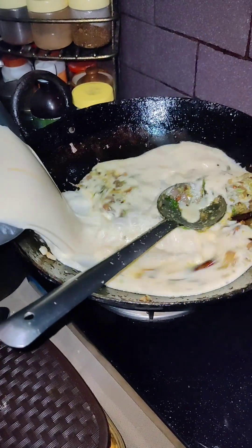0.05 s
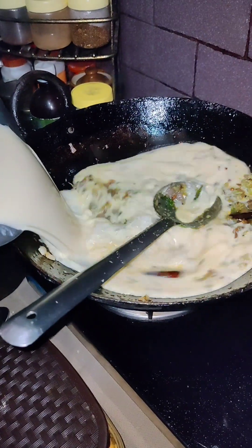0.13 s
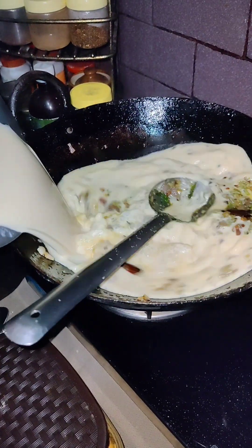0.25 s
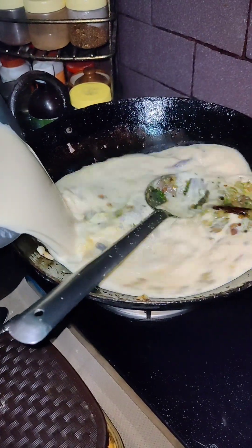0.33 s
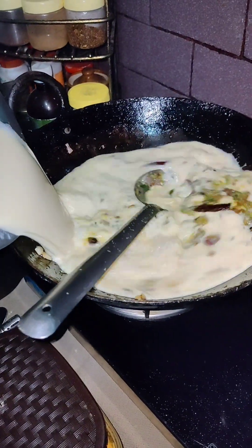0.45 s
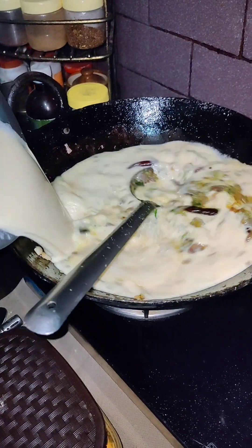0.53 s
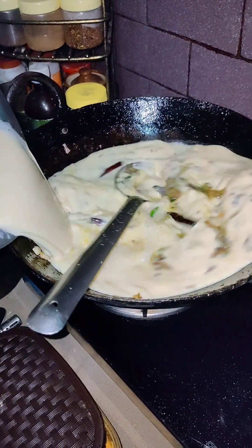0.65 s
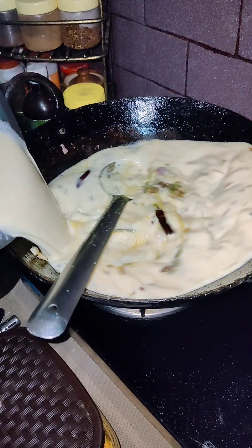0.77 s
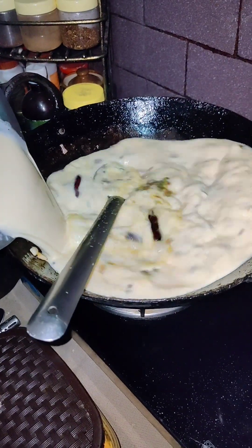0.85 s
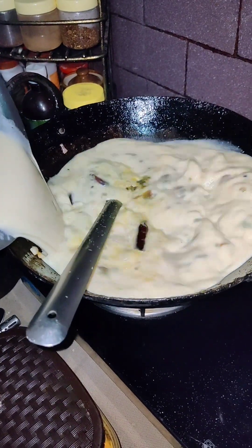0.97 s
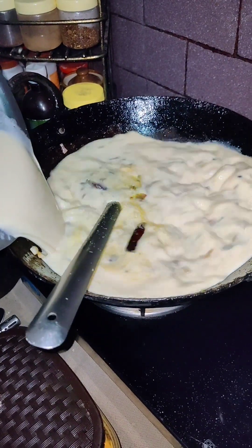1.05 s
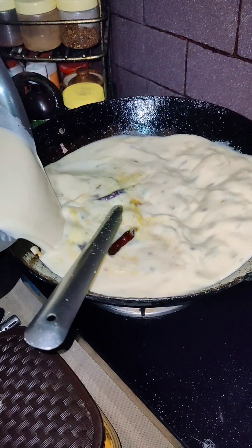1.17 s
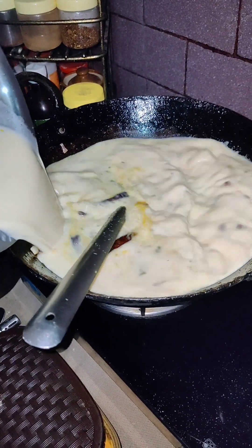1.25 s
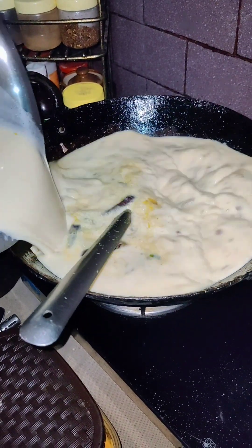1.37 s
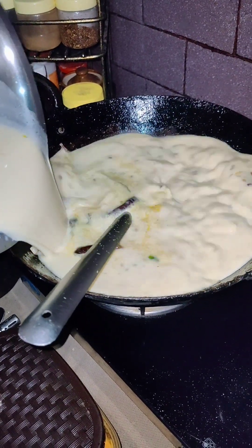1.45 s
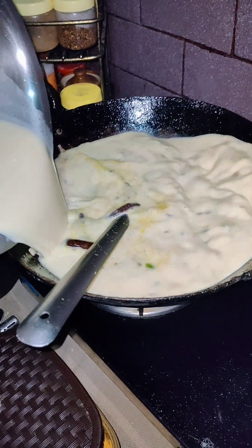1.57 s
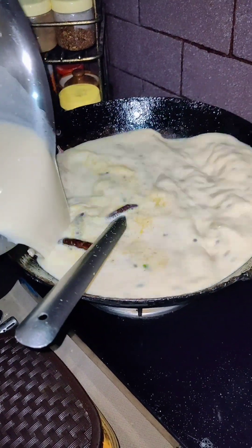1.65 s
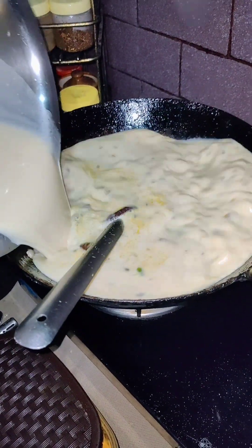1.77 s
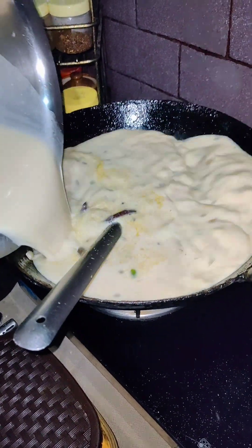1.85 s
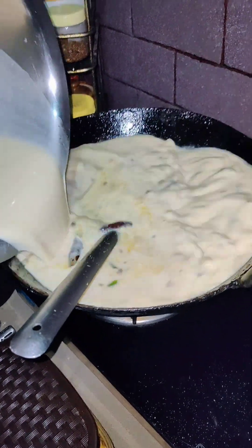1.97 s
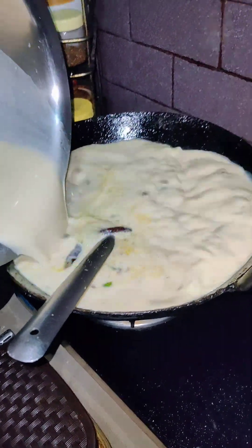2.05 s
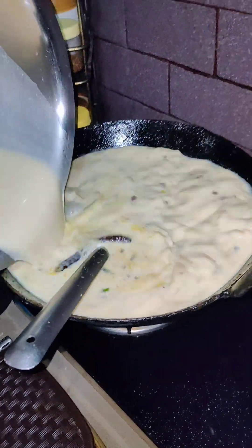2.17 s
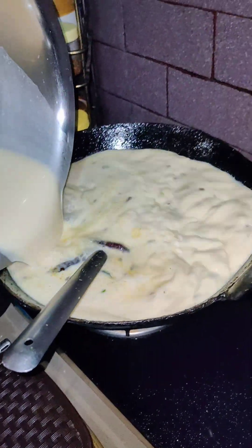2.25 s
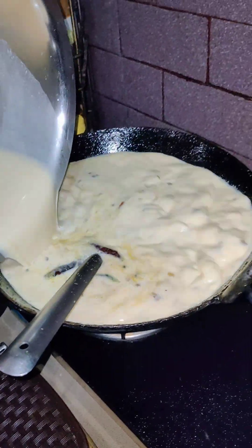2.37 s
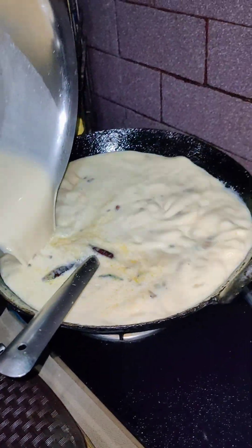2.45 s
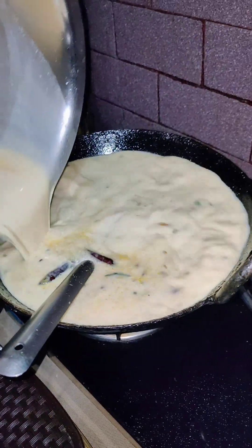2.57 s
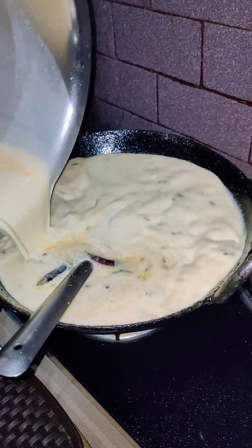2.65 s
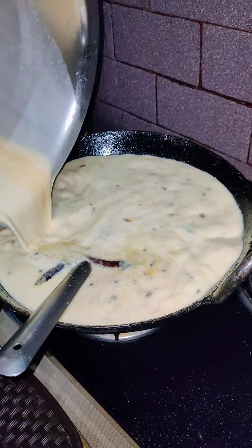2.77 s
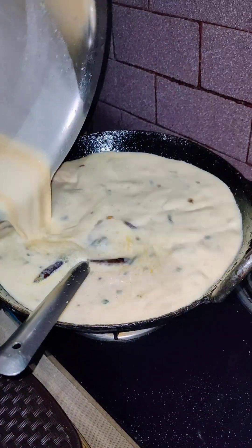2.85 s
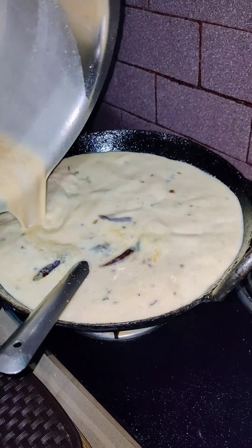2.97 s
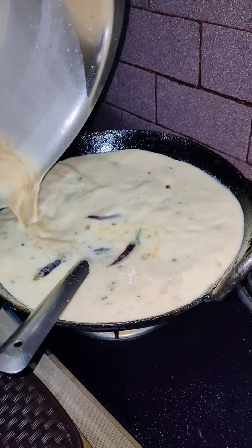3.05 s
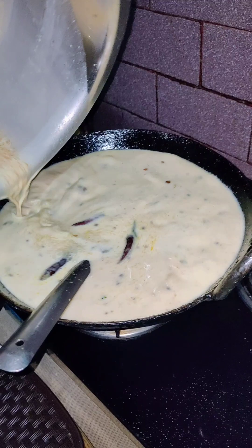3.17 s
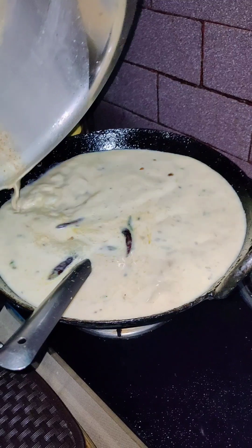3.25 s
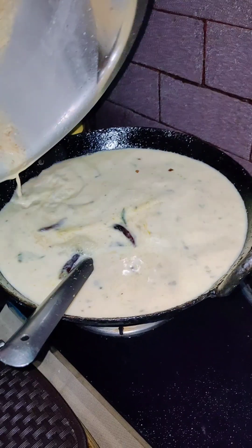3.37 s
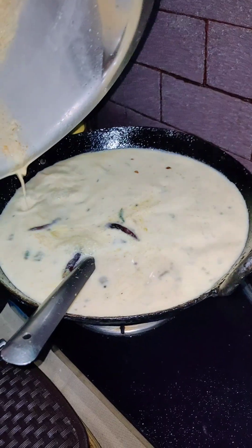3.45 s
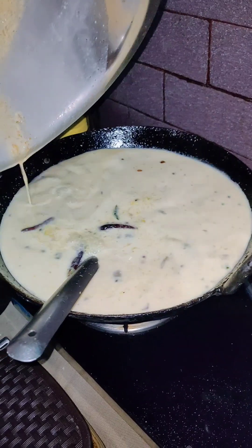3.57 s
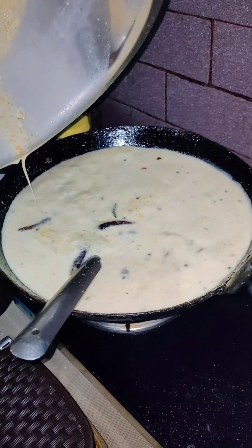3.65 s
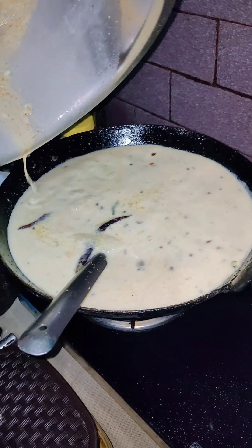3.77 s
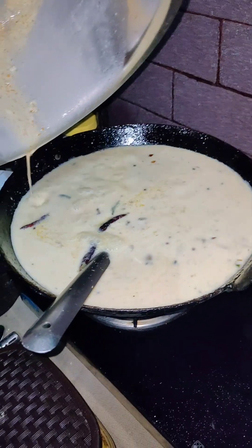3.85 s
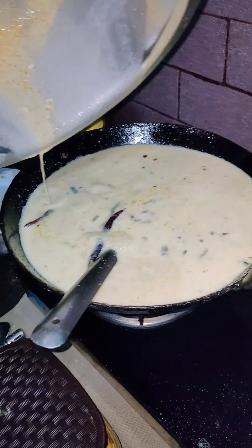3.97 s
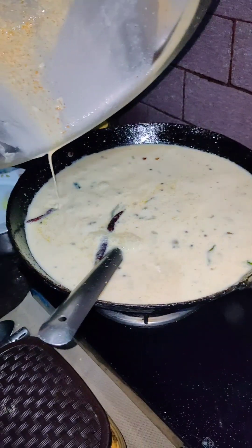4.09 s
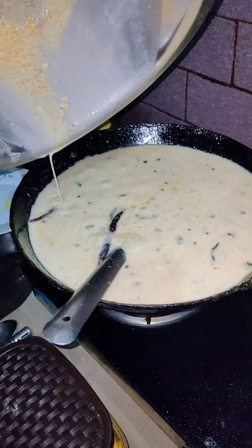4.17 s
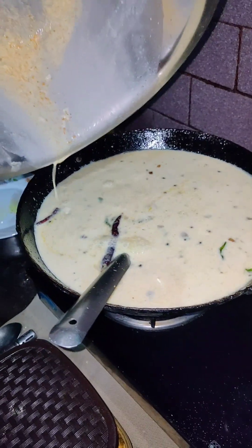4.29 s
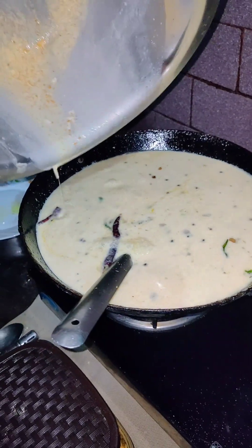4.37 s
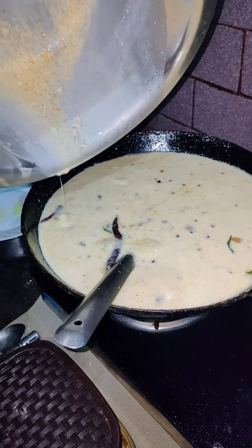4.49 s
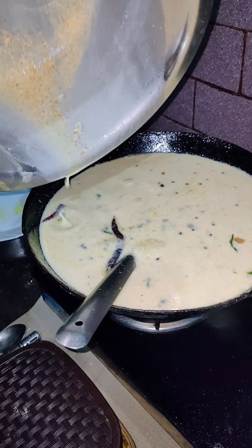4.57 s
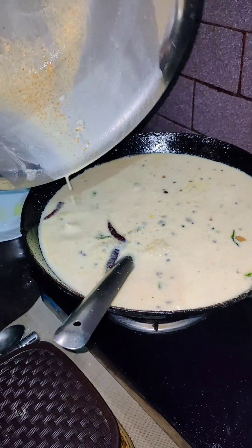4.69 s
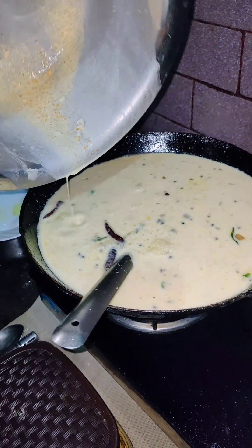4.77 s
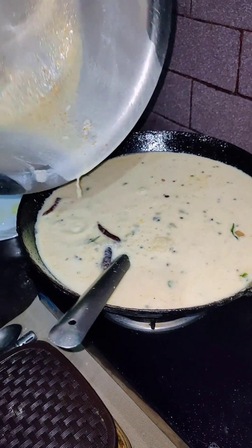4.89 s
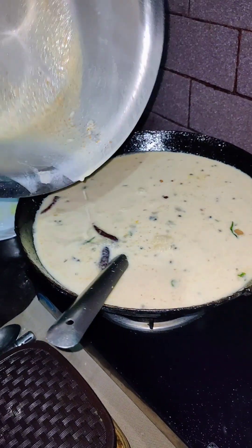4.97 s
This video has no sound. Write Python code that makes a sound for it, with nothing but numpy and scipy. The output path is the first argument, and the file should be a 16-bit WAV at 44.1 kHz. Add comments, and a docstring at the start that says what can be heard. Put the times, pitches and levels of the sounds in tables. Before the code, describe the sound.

Close, loud sizzling and bubbling of batter in hot oil fades to a faint fizz and drips as a steel pot softly bonks.

```python
"""Loud bubbling and sizzling, close to a stereo microphone: batter poured into a hot oiled pan in a small
kitchen. Steam bubbles boil up, getting fewer, smaller and higher as the batter covers and cools the metal,
until only a thin fizz at the rim and a few plops and drips are left. The heavy steel pot bonks softly as
it is tipped and, emptied, is knocked at the very end. An appliance hums underneath."""
import sys
import numpy as np
from scipy import signal
from scipy.fft import rfft, irfft, next_fast_len
from scipy.io import wavfile
from scipy.ndimage import uniform_filter1d, map_coordinates

SR = 44100
rng = np.random.default_rng(int(sys.argv[2]) if len(sys.argv) > 2 else 0)


def materialize(psi):
    """Save the field psi as 16-bit PCM at rate SR to the path in sys.argv[1].

    A 1-D psi becomes a single channel; in a 2-D psi each row is a channel.
    """
    bounded = np.clip(np.atleast_2d(psi).T, -1, 1)
    quanta = np.round(bounded * 32767).astype(np.int16)
    wavfile.write(sys.argv[1], SR, quanta)


N = 221838

# batter covering the pan floor: (time [s], share of the sizzle that comes from the rim [0-1])
COVERED = [(0, 0), (2.3, 0), (3.1, .95), (5.03, 1)]
# spectrum of the finest spray: (frequency [Hz], level [dB])
SPRAY = [(3000, -29.5), (6000, -3.5), (8000, -5), (10500, -4), (13000, -5), (15000, -5.5), (16000, -16)]


def amp(db):
    """Decibels to gain."""
    return 10 ** (np.asarray(db) / 20)


def unit(x):
    """Scale to rms 1."""
    return x / np.sqrt(np.mean(x ** 2) + 1e-20)


def along(points, hz):
    """Read (frequency [Hz], value) points on a log axis."""
    freqs, values = np.transpose(points)
    return np.interp(np.log(hz + 1), np.log(freqs + 1), values)


def curves(rows):
    """One value per sample for each column after the time."""
    times, *columns = np.transpose(rows)
    return [np.interp(np.arange(N) / SR, times, column) for column in columns]


def wobble(rate):
    """A smooth random curve, rate knots a second."""
    return map_coordinates(rng.standard_normal(4096), [np.arange(N) * rate / SR], mode="wrap")


def filtered(x, response):
    """Filter x by a gain that is a function of frequency."""
    size = next_fast_len(N + SR // 4)
    return irfft(rfft(x, size) * response(np.fft.rfftfreq(size, 1 / SR)), size)[..., :N]


def coloured(x, spectrum):
    """x shaped by the given spectrum, at rms 1."""
    return unit(filtered(x, lambda hz: amp(along(spectrum, hz))))


def bump(hz, centre_hz, width_hz):
    """Shape of one resonance, 1 at its centre."""
    return 1 / (1 + (2 * (hz - centre_hz) / width_hz) ** 2)


def resonate(x, peaks):
    """x through peaks and notches: (centre [Hz], width [Hz], lift [dB])."""
    return filtered(x, lambda hz: amp(sum(db * bump(hz, centre, width) for centre, width, db in peaks)))


def steady(x):
    """Take the slow drift out of a stream of grains, leaving rms 1."""
    return x / np.sqrt(np.abs(uniform_filter1d(np.mean(x ** 2, axis=0), size=5000)) + 1e-12)


def patchy(x, depth_db):
    """Each narrow band of x swells and sinks quickly on its own."""
    bands = signal.stft(x, nperseg=512)[2]
    swell = rng.standard_normal(bands.shape[1:])
    for _ in range(2):
        swell = uniform_filter1d(uniform_filter1d(swell, size=5, axis=0), size=7, axis=1)
    return signal.istft(bands * amp(depth_db * unit(swell)), nperseg=512)[1][:, :N]


def add(track, s, sound):
    """Mix a sound into a track at time s."""
    part = track[..., round(s * SR):][..., :sound.shape[-1]]
    part += sound[..., :part.shape[-1]]


def kitchen(x, wet_db, near_db=2, near_t60=0.12, shared_hz=650):
    """From one spot to both microphones: direct sound, then nearby pan wall and tiles, then the room."""
    # reverberation of the room: (frequency [Hz], t60 [s])
    decay = [(200, 0.11), (1000, 0.52), (4000, 0.25), (15000, 0.044)]
    hz, t, bands = signal.stft(rng.standard_normal((2, SR // 3)), SR, nperseg=256)
    tail = signal.istft(bands * amp(-60 * t / along(decay, hz)[:, None]), SR, nperseg=256)[1]
    t = np.arange(tail.shape[1]) / SR
    near = rng.standard_normal(tail.shape) * amp(-60 * t / near_t60) * (t > .001)
    paths = (amp(wet_db) * unit(tail) + amp(near_db) * unit(near)) / np.sqrt(len(t))
    # long waves reach both microphones alike
    alike = np.exp(-(np.fft.rfftfreq(len(t), 1 / SR) / shared_hz) ** 2)
    left, right = rfft(paths)
    paths[0] = irfft(alike * right + np.sqrt(1 - alike ** 2) * left, len(t))
    paths[[0, 1], [rng.integers(6, 9), 0]] += 1  # direct sound reaches the right microphone first
    paths /= np.linalg.norm(paths, axis=1, keepdims=True)
    return signal.fftconvolve(x[None], paths, axes=1)[:, :N]


def bubbles(activity, low_hz, high_hz, count, cycles, spread_db, rise):
    """A stream of ringing bubbles, as dense as the activity; small ones ring higher and die sooner."""
    when, small, strength, phase = rng.random((count, 4)).T
    start = np.minimum(np.searchsorted(np.cumsum(activity) / activity.sum(), when), N - 1)
    pitch = low_hz[start] * (high_hz[start] / low_hz[start]) ** small
    n = np.arange(900)
    turns = pitch[:, None] * n / SR
    age = turns / cycles
    gain = amp(-spread_db * np.log(1 - .99 * strength))
    envelope = gain[:, None] * age ** 2 * np.exp(-age)
    ring = envelope * np.sin(2 * np.pi * (turns * (1 + rise * age) + phase[:, None]))
    return np.bincount((start[:, None] + n).ravel(), ring.ravel(), N)[:N]


def background(rumble_db=-62.5, thud_s=3.1, thud_db=-57.5, thud_width_s=.055):
    """Room tone, stronger on the right: an unsteady appliance hum, low noise and one soft, deep thud."""
    # tones of the appliance: (frequency [Hz], level [dB])
    hum_tones = [(48.4, -59), (75.4, -68), (150.7, -67)]
    # spectra of the room's rumble and its faint hiss: (frequency [Hz], level [dB])
    rumble_colour = [(20, -2), (32, -5), (50, -6), (80, 8.5), (100, 8), (125, 3.5), (160, 1), (210, -16.5),
                     (400, -60)]
    hiss_colour = [(100, -9), (250, 11), (320, 2.5), (420, 9.5), (650, -4.5), (1200, -3), (4000, -12),
                   (16000, -10.5)]
    t = np.arange(N) / SR
    thud = amp(thud_db) * np.exp(-((t - thud_s) / thud_width_s) ** 2)
    hum = sum(amp(db + 1.6 * wobble(5.43)) * np.sqrt(2) * np.sin(2 * np.pi * hz * t + 0.69 * wobble(2.44))
              for hz, db in hum_tones)
    noise = lambda: rng.standard_normal(N) + 0.71 * rng.standard_normal((2, N))
    rumble = np.hypot(amp(rumble_db), thud) * coloured(noise(), rumble_colour)
    hiss = amp(-71) * coloured(noise(), hiss_colour)
    return hum * amp([[-4.5], [2.5]]) + (rumble + hiss) * amp([[-2.5], [1.5]])


def steam(pitch_hz=6270, width_hz=240):
    """Steam squeezes through a pinhole at the rim with a thin, breathy whistle."""
    # strength of the jet: (time [s], level [dB])
    jet = [(0, -100), (2.9, -70), (3.55, -68), (3.95, -66.5), (4.15, -65), (4.18, -57), (4.22, -65),
           (5.03, -65.5)]
    whistle = unit(filtered(rng.standard_normal(N), lambda hz: bump(hz, pitch_hz, width_hz)))
    return amp(curves(jet)[0]) * unit(kitchen(whistle, wet_db=5, near_db=-20))


def pot_clank():
    """Left of centre, the steel pot, damped by the hand and its coat of batter, gives a dull clank."""
    # knocks on the pot: (time [s], level [dB])
    knocks = [(5.013, -42.5), (5.0215, -35)]
    # modes of the emptied pot: (frequency [Hz], level [dB], t60 [s])
    modes = [(587, -39, 0.076), (876, 3, 0.18), (1400, -7, 0.11), (1650, -3, 0.12), (2040, 2, 0.12)]
    out, t = np.zeros(N), np.arange(SR // 5) / SR
    ring = sum(amp(level - 60 * t / t60) * np.sin(2 * np.pi * hz * t) for hz, level, t60 in modes)
    for s, db in knocks:
        add(out, s, amp(db - 9.5) * ring)
    return kitchen(out, wet_db=2, near_db=-7) * amp([[2], [-2]])


def pot_bonks(attack_s=0.015, flutter_rad=0.62, flutter_hz=90, slap_delay_s=0.012, slap_t60=0.16):
    """A soft push sways the batter-laden pot: a short, low, unsteady ring, then a hollow slap."""
    # the pot is shifted and tipped: (time [s], ring level [dB], pitch [ratio], slap level [dB])
    pushes = [(1.174, -55, .74, -47), (2.497, -37.5, 0.98, -40)]
    # modes of the laden pot: (frequency [Hz], level [dB], t60 [s])
    modes = [(245, -1, 0.07), (320, 8, 0.08), (372, 11, 0.18), (520, -9, 0.1)]
    # hollow ring of the slap: (centre [Hz], width [Hz], lift [dB])
    slap_peaks = [(705, 47, 18), (1000, 60, 13), (1540, 100, 18), (1850, 70, 26), (2030, 50, 15),
                  (2490, 110, 13)]
    # broad spectrum of the slap: (frequency [Hz], level [dB])
    slap_colour = [(120, -11), (210, 13), (400, 9), (560, 1), (750, 2), (2500, 0.5), (4000, -9),
                   (8000, -30)]
    rings, slaps, t = np.zeros((2, N)), np.zeros(N), np.arange(SR // 4) / SR
    sway = lambda: flutter_rad * map_coordinates(rng.standard_normal(len(t)), [t * flutter_hz], order=1)
    for s, db, ratio, slap_db in pushes:
        ring = sum(amp(level - 60 * t / t60) * np.sin(2 * np.pi * ratio * hz * t + sway())
                   for hz, level, t60 in modes)
        heard = kitchen(ring * (1 - np.exp(-t / attack_s)) ** 2, wet_db=-5, near_db=-11, near_t60=0.083)
        add(rings, s, amp(db) * heard / np.abs(heard).max())
        slap = coloured(resonate(rng.standard_normal(N), slap_peaks), slap_colour)[:len(t)]
        add(slaps, s + slap_delay_s, amp(slap_db - 60 * t / slap_t60) * slap)
    return rings * amp([[-2], [2]]) + kitchen(slaps, wet_db=-4.5, near_db=-3, near_t60=.04)


def spits(t60=0.014):
    """A drop of water flashes to steam with a sharp, bright, close tick."""
    # drops in the oil: (time [s], level [dB])
    drops = [(3.337, -33), (3.447, -42), (4.183, -46), (4.69, -36)]
    out, t = np.zeros(N), np.arange(SR // 50) / SR
    for s, db in drops:
        add(out, s, amp(db - 10) * rng.standard_normal(len(t)) * amp(-60 * t / t60))
    ticks = filtered(out, lambda hz: amp(along(SPRAY, hz)))
    return kitchen(ticks, wet_db=-12, near_db=11, near_t60=.03)


def simmer(level_db=-70, low_hz=2190, high_hz=3260):
    """Once the pan floor is covered, single small bubbles pop along the rim."""
    covered, = curves(COVERED)
    pops = bubbles(covered ** 8 + 1e-9, np.full(N, low_hz), np.full(N, high_hz),
                   count=45, cycles=3.1, spread_db=0.5, rise=0.0015)
    return amp(level_db) * unit(kitchen(pops, wet_db=-9.5, near_db=1))


def plops(opening_cycles=3, rise=0.42, flutter_rad=0.61, splash_db=-9,
          froth_db=-11, froth_s=.035, froth_oct=1.105, froth_t60=0.017):
    """An air pocket opens and rings; its soft wall flutters, its skin tears wetly and sheds a froth."""
    # large pockets bursting and, at last, drips landing: (time [s], level [dB], pitch [Hz], t60 [s])
    pockets = [(.316, -27, 1285, .06), (.32, -33, 2420, .054), (.386, -32.5, 903, .045),
               (.399, -32, 752, .044), (.42, -32, 1140, .05), (.478, -27, 1217, .045),
               (.503, -27.5, 793, .03), (.605, -28, 1350, .05), (.738, -33, 1234, .03),
               (1.07, -30.5, 1318, .05), (1.443, -26.5, 1510, .045), (1.881, -27, 1430, .035),
               (1.9, -29.5, 1370, .04), (1.979, -33.5, 1490, .016), (2.147, -34, 1274, .025),
               (2.174, -31.5, 1265, .06), (2.26, -45, 770, .07), (2.368, -47, 800, .04),
               (2.875, -48, 1266, .042), (3.295, -56, 644, .08), (3.312, -59, 500, .04),
               (3.368, -53.5, 1218, .09), (3.38, -41.5, 2460, .05), (3.443, -44, 1194, .06),
               (3.455, -51.5, 785, .075), (3.505, -38, 810, .035), (3.522, -42.5, 800, .04),
               (3.545, -54, 1510, .046), (3.6, -52.5, 1490, .06), (3.639, -45.5, 1194, .07),
               (4.064, -43.5, 2950, .045), (4.21, -51, 1976, .045), (4.283, -42, 2480, .04),
               (4.324, -53.5, 1410, .04), (4.449, -58, 1660, .05), (4.589, -49, 1690, .045),
               (4.698, -59, 1450, .05), (4.829, -59, 1280, .05)]
    out, t = np.zeros((2, N)), np.arange(SR // 5) / SR
    for s, db, hz, t60 in pockets:
        wall = map_coordinates(rng.standard_normal(len(t)), [t * hz / 4], order=1)
        skin_band = signal.butter(3, [hz * 0.96, hz * 2.07], "band", fs=SR, output="sos")
        splash = amp(splash_db) * unit(signal.sosfilt(skin_band, rng.standard_normal(len(t))))
        ring = np.sin(2 * np.pi * hz * t * (1 + rise * t) + flutter_rad * wall)
        pop = (ring + splash) * amp(-60 * t / t60) * (1 - np.exp(-t * hz / opening_cycles))
        froth_envelope = amp(froth_db - 60 * t / froth_t60) * (1 - np.exp(-t * hz))
        for late, small in rng.random((4, 2)):
            froth_hz = hz * 2 ** (small * froth_oct)
            add(pop, late * froth_s, froth_envelope * np.sin(2 * np.pi * froth_hz * t))
        heard = kitchen(pop, wet_db=-8, near_db=0, near_t60=0.045)
        add(out, s, amp(db) * heard / np.abs(heard).max())
    return out * amp([[-.5], [.5]])


def crackle(rate, spread_db, spots):
    """Tiny bursts of water in hot oil, rate a second at each spot, a few much stronger than the rest."""
    out = np.zeros((2, N))
    for _ in range(spots):
        strength = np.minimum(rng.exponential(size=N), 5)
        bursts = (rng.random(N) < rate / SR) * amp(spread_db * strength) * rng.choice([-1, 1], N)
        out += kitchen(bursts, wet_db=1.5, near_db=0.5)
    return steady(out)


def spurt(peak_s, rise_s, fall_ratio=2.8):
    """A tongue of batter reaches fresh hot metal: a quick swell and a slower fall."""
    t = (np.arange(N) / SR - peak_s) / rise_s
    return np.exp(np.minimum(t, -t / fall_ratio))


def frying(uneven_db=1.0, uneven_at_rim_db=0.2):
    """Oil crackles in spurts where batter meets bare metal: all over at first, at last only at the rim."""
    # how hard the oil fries: (time [s], oil level [dB], finest spray level [dB])
    fry = [(0, -39, -45.5), (.22, -39.5, -50), (.6, -40, -46.5), (1.32, -41.5, -47.5), (1.43, -44.5, -52),
           (1.54, -41, -46), (1.94, -45, -51.5), (2.15, -46, -55), (2.66, -47, -59.5), (2.79, -53, -66),
           (3.05, -51, -72), (3.2, -54, -87), (3.32, -56, -96), (3.36, -52, -73), (3.5, -53.5, -70),
           (3.58, -57, -65), (3.63, -49, -62), (3.8, -53, -65.5), (3.94, -61.5, -68), (4.03, -62, -67),
           (4.11, -54.5, -61.5), (4.46, -55, -62), (4.65, -55, -67.5), (4.75, -56, -69.5), (5.03, -59, -74)]
    # spurts on fresh metal: (time [s], oil level [dB], finest spray level [dB], rise [s])
    spurts = [(0.056, -58, -45, 0.017), (0.495, -41, -62, 0.026), (1.91, -40, -46, 0.016),
              (2.93, -55, -61.5, 0.023), (3.16, -56, -68, 0.0063), (3.45, -69, -55, 0.017),
              (3.69, -48, -73, 0.02), (4.182, -47.5, -61, 0.0091), (4.33, -50, -73, 0.0062),
              (4.592, -50, -70, .008), (4.707, -56.5, -60, 0.012), (4.845, -56, -65, 0.0096)]
    # spectrum of the frying oil: (frequency [Hz], level [dB])
    oil_colour = [(900, -30), (1800, -17), (2400, 2), (3200, 5.5), (4200, 1.5), (5500, -3), (6600, -7),
                  (7700, -8.5), (10000, -19), (16000, -79)]
    oil, spray = amp(curves(fry))
    for s, oil_db, spray_db, rise_s in spurts:
        swell = spurt(s, rise_s)
        oil, spray = np.hypot(oil, amp(oil_db) * swell), np.hypot(spray, amp(spray_db) * swell)
    covered = np.clip(curves(COVERED)[0], 0, 1)
    on_floor = np.sqrt(1 - covered) * crackle(rate=750, spread_db=2.0, spots=7)
    at_rim = np.sqrt(covered) * crackle(rate=200, spread_db=2.5, spots=5)
    bursts = on_floor + at_rim
    flicker_db = ((1 - covered) * uneven_db + covered * uneven_at_rim_db) * wobble(21.22)
    oil *= amp(1.44 + flicker_db)
    spray *= amp(2.0 + 0.58 * flicker_db + wobble(26.7))
    return oil * coloured(bursts, oil_colour) + spray * coloured(bursts, SPRAY)


def boiling(spots=5, thinning=.4, surge_db=0.9, surge_oct=0.12, smallest_hz=3994, smallest_at_rim_hz=2500):
    """Steam bubbles break through the batter at several spots; the weaker the boil, the fewer."""
    # the boil weakens as the pan cools: (time [s], level [dB], pitch of the largest bubbles [Hz])
    boil = [(0, -39, 686), (.28, -38.5, 603), (.38, -38, 573), (.5, -35.5, 515), (.62, -36, 460),
            (.88, -38, 460), (1.25, -41, 534), (2.15, -45.5, 735), (2.45, -48, 970), (2.65, -49, 1050),
            (2.78, -54, 1230), (3.08, -60, 1740), (3.3, -69, 2150), (3.95, -68, 2180), (4.01, -73, 2250),
            (4.1, -68.5, 2280), (5.03, -70, 2400)]
    # spectrum of the boil: (frequency [Hz], level [dB])
    boil_colour = [(200, -7.5), (450, -12), (700, -6), (1000, -2.5), (1350, 3.5), (1700, 3.5), (2400, 9.5),
                   (3300, -1), (4500, -1), (8000, -33)]
    boil_db, low_hz = curves(boil)
    covered, = curves(COVERED)
    surge = wobble(16)  # each surge is louder and, on the open floor, deeper
    boil_db += surge_db * surge
    low_hz *= 2 ** (-surge_oct * surge * (1 - covered))
    high_hz = smallest_hz + (smallest_at_rim_hz - smallest_hz) * covered ** 4
    activity = amp(thinning * boil_db)
    streams = [bubbles(activity, low_hz, high_hz, count=1500, cycles=0.9, spread_db=2.0, rise=0.00065)
               for _ in range(spots)]
    heard = sum(kitchen(stream, wet_db=3, near_db=-1) for stream in streams)
    return amp(boil_db + 3) * steady(coloured(heard, boil_colour))


def pan(sizzle):
    """The sizzle sounds through the pan's hollow and, as the floor is covered, the fitful gap at its rim."""
    # resonances, all (centre [Hz], width [Hz], lift [dB])
    hollow = [(948, 58, 6.5), (1290, 134, 2), (1450, 30, 7), (1564, 45, 3.5), (1990, 66, 0.5),
              (3320, 210, 1.5), (6190, 1300, 4)]  # the pan between hob and wall
    gap = [(1690, 70, 4), (1800, 70, -6), (2120, 90, -13), (2280, 80, 8), (2450, 130, 7), (2760, 60, 5),
           (2920, 120, -9), (3080, 70, 6), (3230, 70, -7), (3370, 60, 3), (3480, 60, -4), (3620, 170, 6.5),
           (3950, 250, -7), (4330, 240, 3), (4900, 300, 1.5), (5600, 200, 3), (6200, 400, 2.5),
           (8900, 1700, -2.5), (12100, 410, 1)]  # the narrow gap between batter and pan wall
    gap_left = [(2000, 430, -6.5), (3060, 54, -6), (3260, 91, -11.5), (3600, 180, -7), (7700, 890, -6)]  # its added colour at the left microphone
    gap_right = [(1430, 300, -17), (1960, 180, 11.5), (2610, 160, 0.5), (3080, 440, -24), (4930, 890, -4)]  # and at the right
    covered, = curves(COVERED)
    open_pan = amp(-0.9) * resonate(sizzle, hollow)
    left, right = patchy(open_pan, depth_db=1.8)
    rim = np.array([resonate(left, gap + gap_left), resonate(right, gap + gap_right)])
    return (1 - covered) * open_pan + covered * rim * amp([[.7], [-.7]])


def scene():
    """At the hob: the sizzling pan up close, the pot beside it, the room tone behind."""
    sizzle = pan(boiling() + frying() + simmer())
    return sizzle + steam() + plops() + pot_bonks() + spits() + pot_clank() + background()


def record(dry):
    """The left microphone port rings in the top treble, the right is fuller in the mids; both band-limited."""
    top_hz = 15800
    left = lambda hz: 0.034 + 6.9 * bump(hz, 12900, 1070)
    right = lambda hz: -.4 + 6 * bump(hz, 737, 180) + 4 * bump(hz, 1215, 150)
    return filtered(dry, lambda hz: amp([left(hz), right(hz)]) * (hz < top_hz))


dry = scene()
out = record(dry)
materialize(out)
```